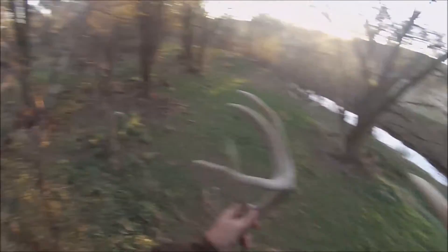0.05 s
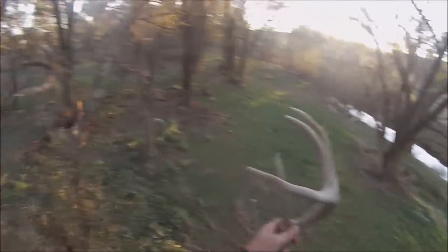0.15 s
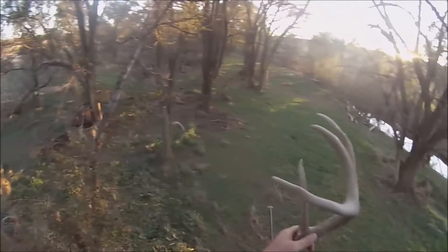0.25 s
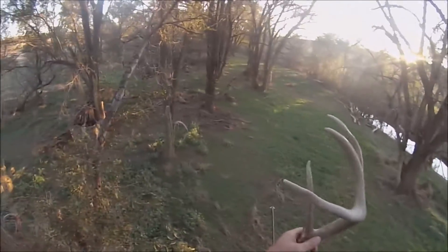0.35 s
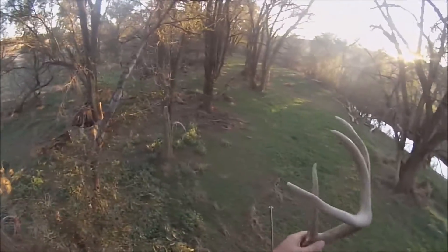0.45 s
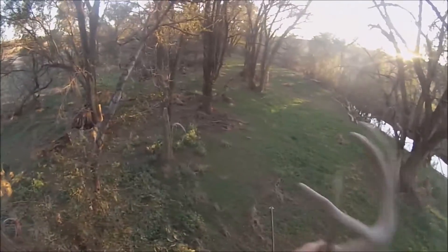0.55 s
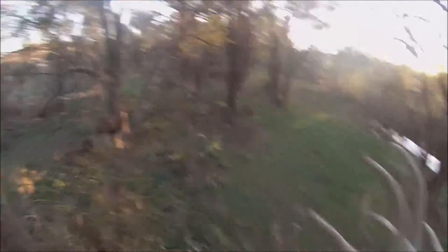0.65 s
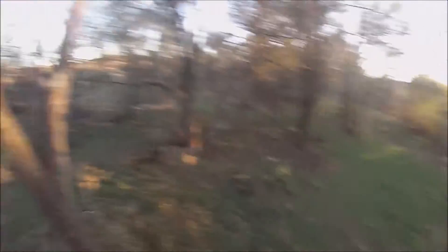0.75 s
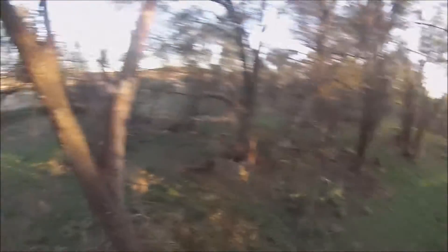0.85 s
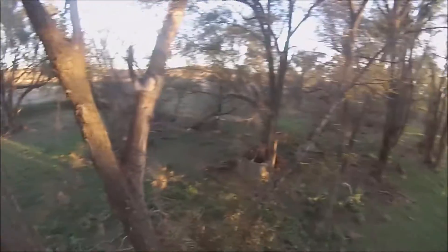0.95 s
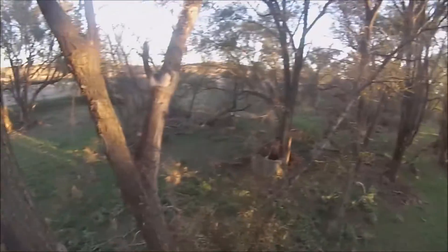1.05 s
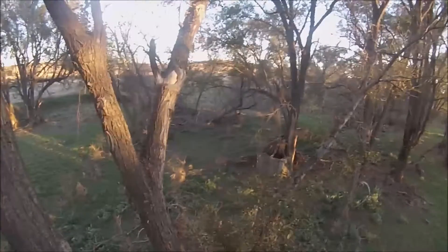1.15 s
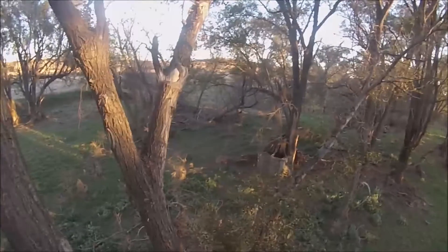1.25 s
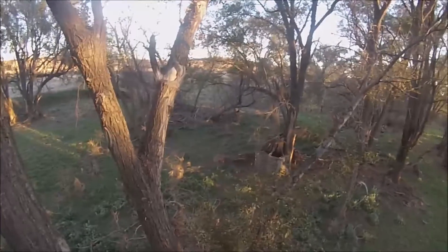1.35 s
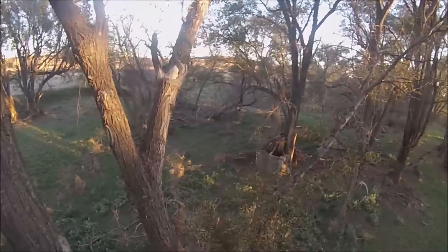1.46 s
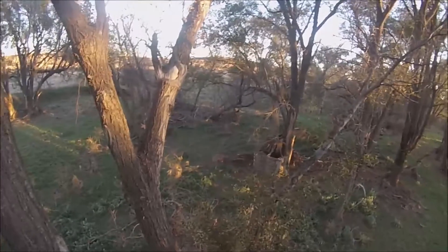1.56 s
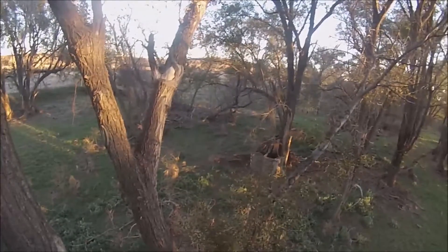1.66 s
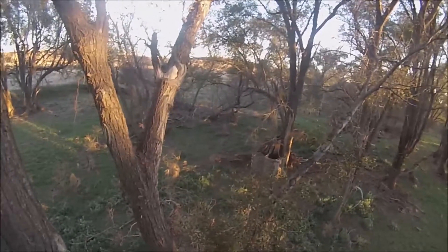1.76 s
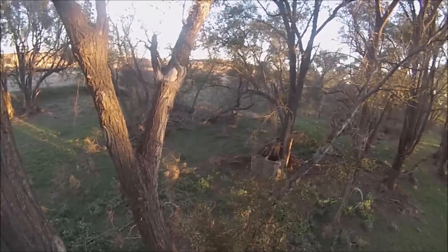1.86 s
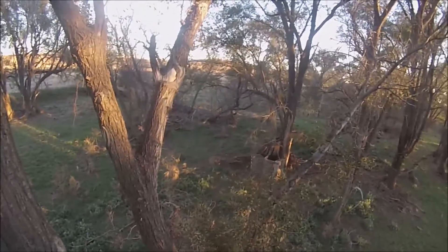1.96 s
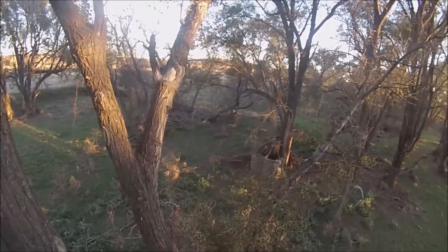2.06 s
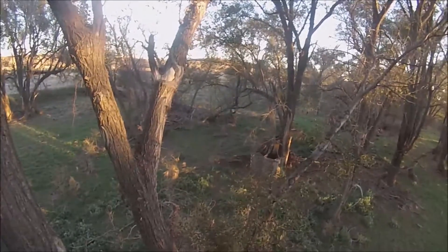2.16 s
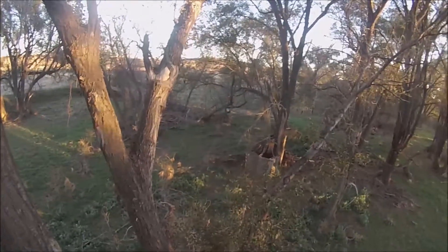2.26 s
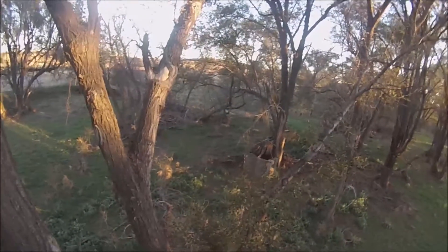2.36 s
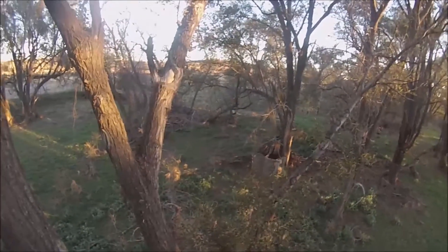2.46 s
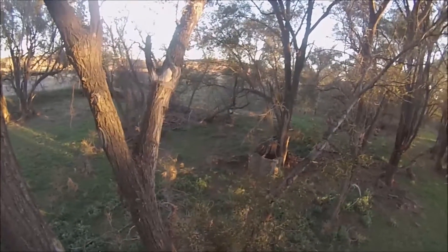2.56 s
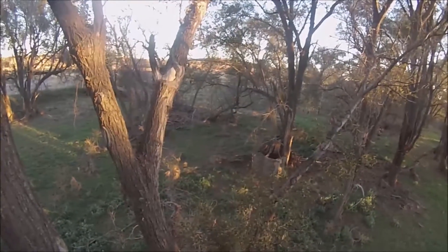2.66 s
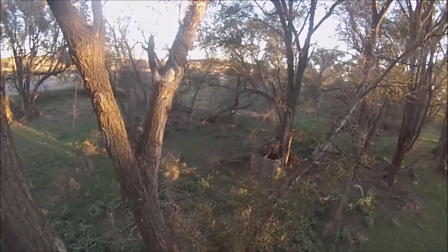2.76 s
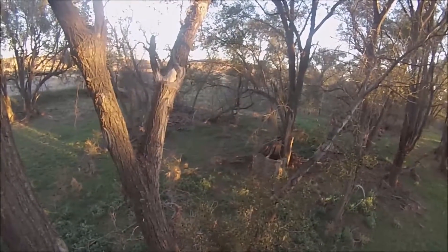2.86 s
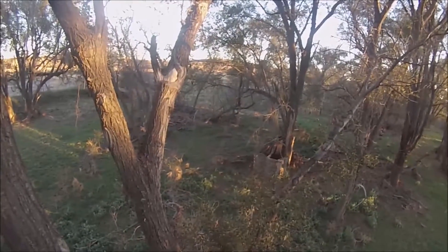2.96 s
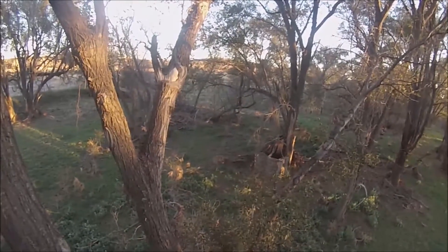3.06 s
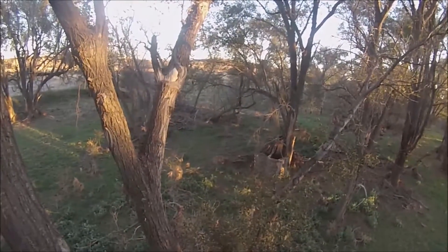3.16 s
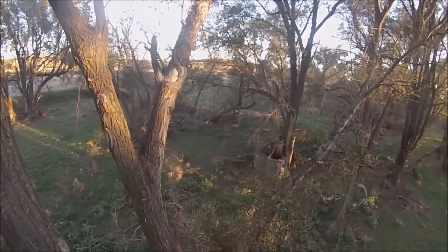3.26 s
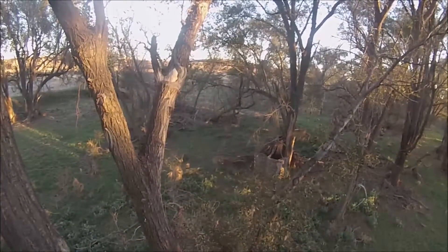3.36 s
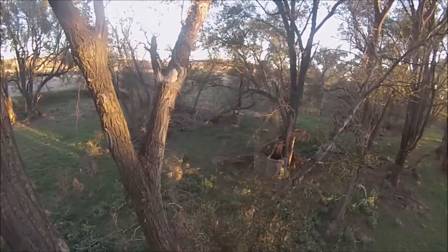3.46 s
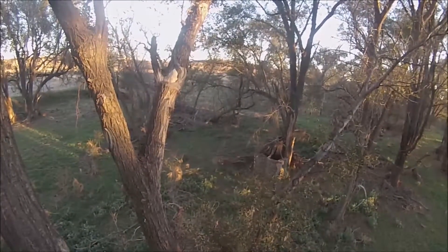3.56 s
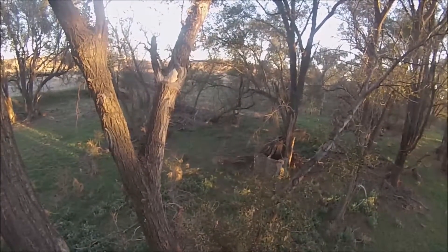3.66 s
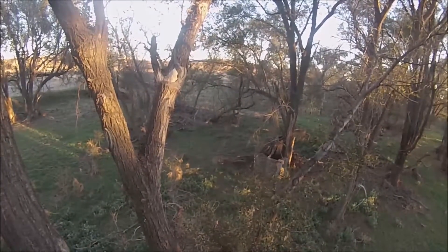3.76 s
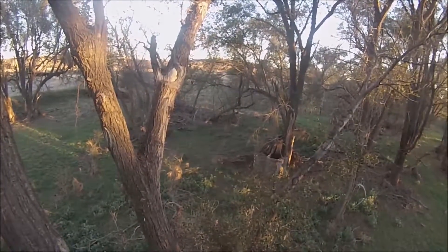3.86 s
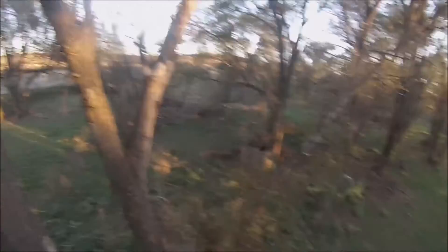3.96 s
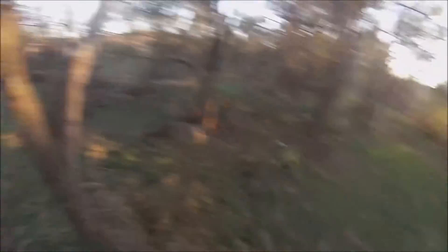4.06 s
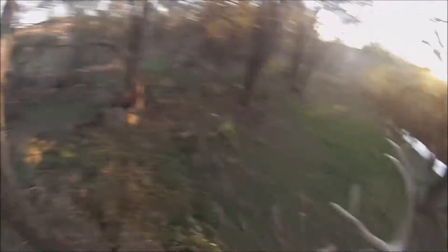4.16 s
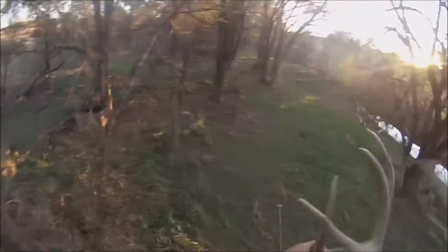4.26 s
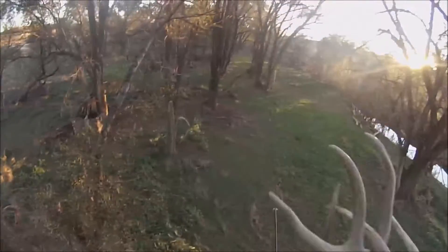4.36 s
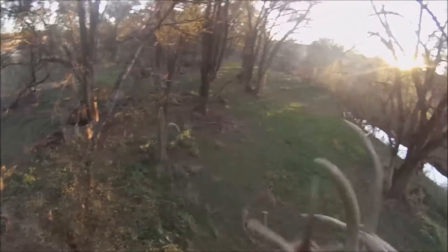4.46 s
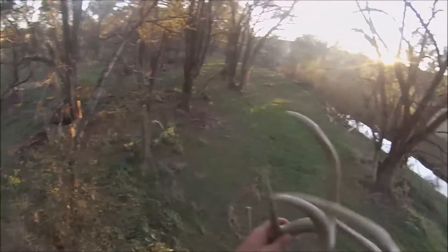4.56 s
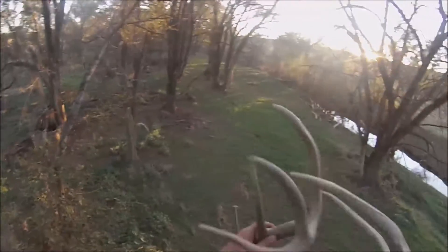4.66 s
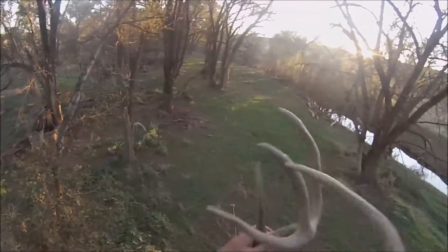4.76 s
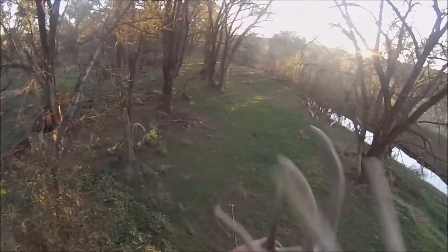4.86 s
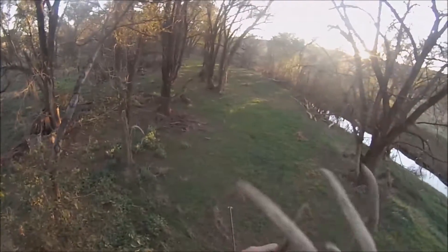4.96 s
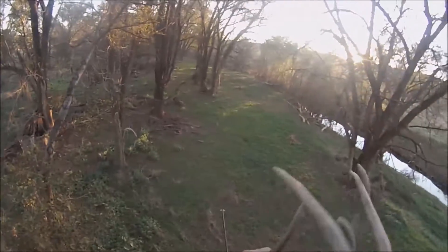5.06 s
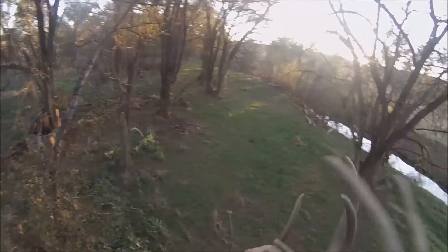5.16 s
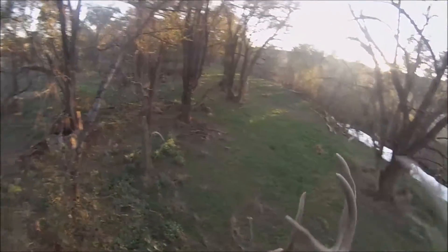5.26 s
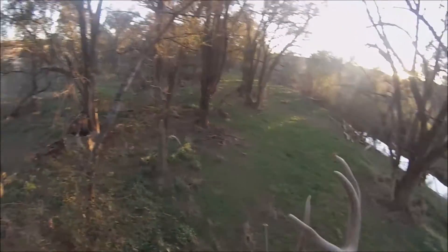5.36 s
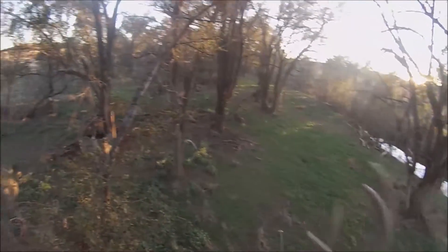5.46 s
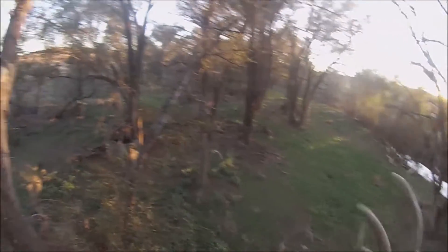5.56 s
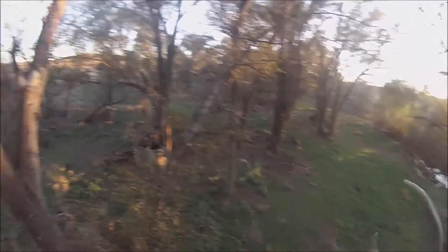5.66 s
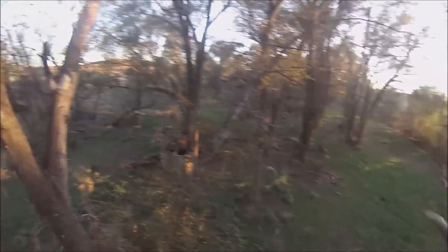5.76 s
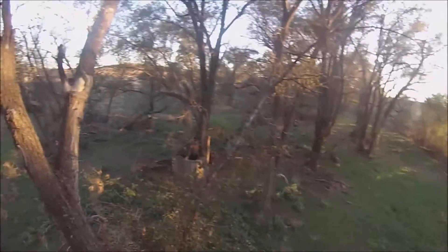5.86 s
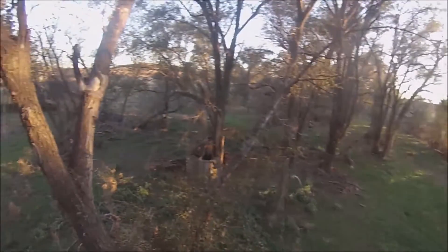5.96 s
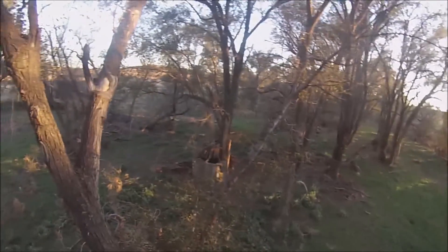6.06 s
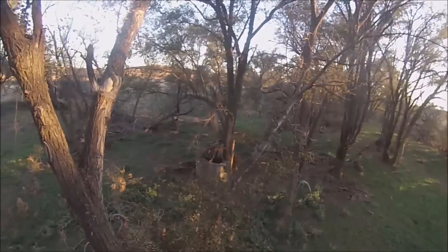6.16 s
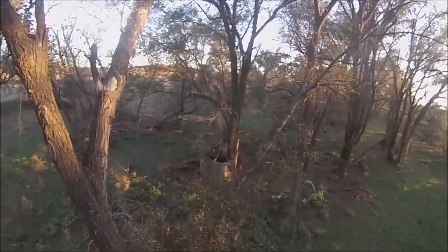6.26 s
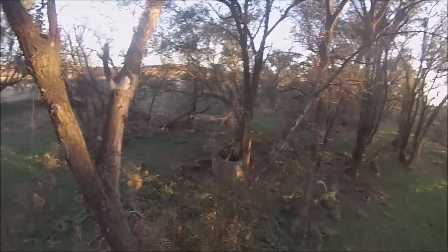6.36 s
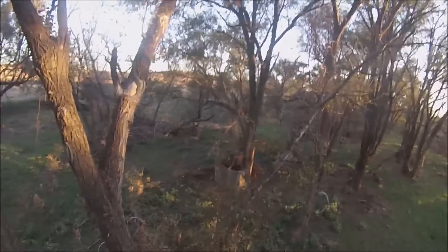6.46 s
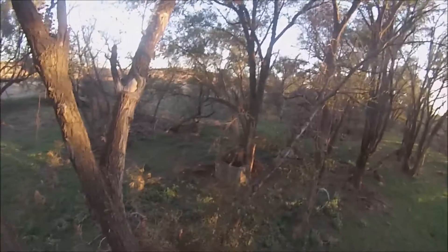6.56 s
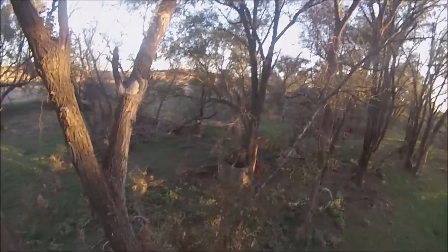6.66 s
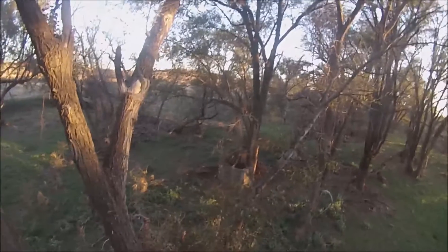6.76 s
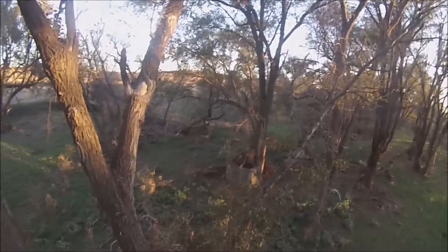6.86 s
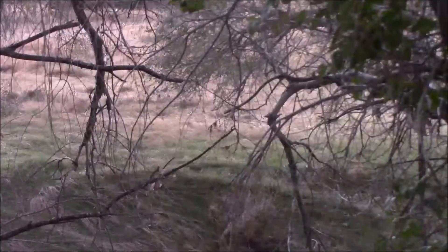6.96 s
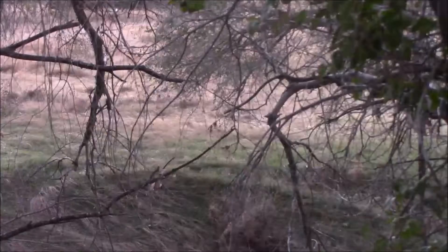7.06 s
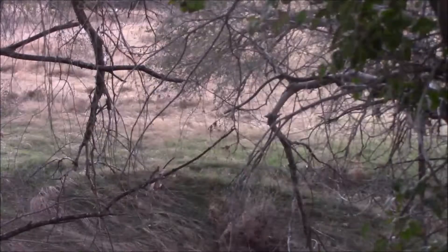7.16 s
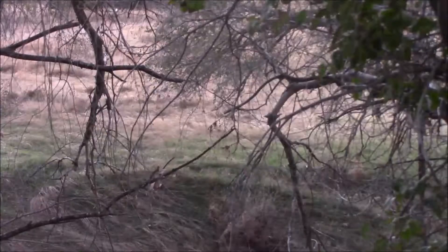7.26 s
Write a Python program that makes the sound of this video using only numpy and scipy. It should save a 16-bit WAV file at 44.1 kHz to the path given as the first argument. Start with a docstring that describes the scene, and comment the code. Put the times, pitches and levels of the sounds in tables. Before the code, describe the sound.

Close, dry rattling of antlers outdoors: hard bony cracks with bright tine ticks and hollow beam knocks around seven hundred hertz. Two short bursts come in the first second, then a quiet gap with faint scrapes. From three seconds on come irregular clusters, dense between four and seven seconds, with grinding between blows. Behind it lie a faint airy hush, low lumpy breeze and a short scattered woodland echo.

```python
"""Up in a tree in quiet woods, a pair of deer antlers is clacked and ground together in quick bouts, at arm's length.
Every contact drives decaying sines: tine tips give bright ticks, thick beams a hollow knock, sliding a grainy rub.
The trunks scatter back a faint tail of decaying noise bands.
Shaped noise makes the hush of the woods and a light, lumpy breeze on the microphone."""
import sys
import numpy as np
from scipy import signal
from scipy.fft import rfft, irfft, next_fast_len
from scipy.io import wavfile

SR = 44100
rng = np.random.default_rng(int(sys.argv[2]) if len(sys.argv) > 2 else 0)


def master_out(mix):
    """Clip the mix to full scale and print it as 16-bit PCM to the path in sys.argv[1]."""
    frames = np.transpose(np.atleast_2d(mix))
    ceiling = np.clip(frames, -1, 1)
    pcm = np.round(ceiling * 32767).astype(np.int16)
    wavfile.write(sys.argv[1], SR, pcm)


N = 321925
TIME_S = np.arange(N) / SR
CUTOFF_HZ = 15900

# one antler struck on the other: (time [s], strength [dB], hollow body [dB], edge near 5 kHz [dB],
#   snap near 10 kHz [dB], beam note [Hz], tine note [Hz], beam note t60 [s],
#   squareness [dB], high = head-on, low = glancing, rebounds [count])
CLACKS = [(0.0941, -19, -9.5, -3, -6, 478, 3300, 0.044, -8, 0),
          (0.1863, -10.5, -8.5, -2, 3, 719, 4180, 0.043, 12, 0),
          (0.22, -26, 4, 3, 5, 669, 2120, 0.07, 15, 0), (0.2447, -12, 0, -5, -2, 800, 2580, 0.038, -8, 0),
          (0.2537, -11, -4.5, 1.5, -2, 1073, 2920, 0.08, 4, 1),
          (0.2685, -12, -3.5, -3.5, -10, 680, 3400, 0.052, -3, 0),
          (0.284, -17, -6.5, -5, -6, 800, 2530, 0.047, -2, 1),
          (0.472, -52, 8, -20, -17, 368, 1780, .04, 7, 0),
          (0.9073, -12.5, -5, -2.5, 7, 557.5, 3020, .03, 2, 0),
          (0.9147, -4, -1.5, -3.5, 5, 727, 2420, .07, -0.5, 0),
          (0.9252, -9.5, 1, -11.5, -13, 729, 1966, 0.11, 9, 0),
          (0.938, -14.5, -0.5, 7, 12.5, 683, 3600, 0.046, 7, 0),
          (0.96, -22, 8.5, -5.5, -7, 680, 2580, 0.042, -16.5, 0),
          (1.2126, -56.5, 21.5, -2, -7, 731, 1690, .06, -12, 0),
          (1.4192, -44, 5, -15, -14, 670, 2620, .05, -13, 0),
          (1.5653, -45.5, 16, -21.5, -10.5, 740, 1820, 0.091, -8.5, 0),
          (2.3645, -48, -2, -7.5, -14.5, 720, 2700, .04, -4.5, 0),
          (2.662, -37.5, 6.5, -7.5, -5, 637, 3256, 0.037, -2, 0),
          (2.732, -27, -1, -9.5, -0.5, 719, 2460, 0.048, -1, 0),
          (2.9862, -13.5, -8, 1, -2.5, 934, 4300, 0.03, 1, 0),
          (3.0081, -8.5, 0, 5, 6, 473, 2480, 0.036, 3, 1),
          (3.018, -9.5, 1.5, 5, 5.5, 710, 2440, 0.052, 0, 0),
          (3.0283, -14.5, 3.5, -11.5, -2, 910, 2080, 0.054, 4, 0),
          (3.0444, -14, 0.5, 5.5, 0, 655, 1763, 0.044, 4, 1),
          (3.0942, -23, 0, 2, -14, 890, 4880, 0.068, -5, 0),
          (3.2165, -41, 2, 9, -1, 660, 2160, 0.036, 0, 0),
          (3.605, -16, 4.5, 11.5, -6, 698, 3730, 0.029, 1.5, 0),
          (3.6999, -17, -4, 2.5, -6, 708, 2284, 0.036, -1, 0),
          (4.1759, -9.5, -13, 1.5, -2, 500, 3460, 0.038, -10.5, 0),
          (4.1821, -13.5, 4, 10, 7.5, 848, 3220, .04, -8, 0),
          (4.1936, -9.5, 1.5, 7.5, 7, 850, 3400, 0.034, 4, 0),
          (4.2106, -10, 6, 0, -8.5, 664, 1920, 0.041, 4, 1),
          (4.225, -13.5, -1, 10, 2, 672, 3330, 0.034, 7, 0),
          (4.2491, -29, 17, 2.5, 0, 683, 1700, 0.037, -5, 0),
          (4.303, -21, 0, 6.5, -9, 673, 5110, 0.048, -17, 0),
          (4.4683, -21.5, 0.5, -4, -10, 727, 2600, 0.017, -8, 0),
          (4.635, -25, 5, -2.5, -21, 741, 2400, 0.034, 0, 0),
          (4.6536, -7.5, -4, -2, -3, 650, 2830, 0.023, -2.5, 0),
          (4.759, -22, 3.5, -14, -11.5, 667, 2340, 0.013, 5, 0),
          (4.8116, -14, 4.5, -6, -14.5, 698, 1950, .075, -2.5, 0),
          (4.832, -22.5, 0, -16, -23, 430, 2170, 0.084, -10, 0),
          (4.9012, -14, 3.5, 1.5, -13.5, 576, 1836, 0.045, 4.5, 0),
          (4.9544, -26.5, -1, 1, 0, 735, 3800, .04, -8, 0),
          (4.9892, -19, -2.5, -6, -5, 740, 2870, 0.02, 2, 0),
          (5.0656, -13, -7, -10, -3.5, 690, 2450, 0.014, -5, 0),
          (5.128, -17.5, 3.5, -3.5, 6.5, 580, 2740, .04, 12, 0),
          (5.1615, -11, -10, -3, -12.5, 1050, 3160, 0.046, 14, 0),
          (5.2583, -15.5, -3, -0.5, 12, 820, 2315, 0.045, 3, 0),
          (5.3099, -14, 1.5, 3.5, 10, 670, 2640, 0.031, -8, 1),
          (5.3499, -19.5, 5, 5, -7, 690, 3440, 0.21, -7, 0),
          (5.4657, -22, -2, -1.5, 4, 715, 2820, 0.05, 9, 0),
          (5.5237, -9.5, -6.5, -1.5, -4, 733.6, 3310, 0.17, 4.5, 0),
          (5.5418, -22.5, 1.5, 9, 3.5, 760, 5310, 0.057, 2.5, 0),
          (5.8523, -6, 0.5, 0, 5, 655, 3188, 0.12, -6.5, 2),
          (5.9708, -36, -10, -5, -12, 685, 2720, 0.038, -7.5, 0),
          (6.2428, -17, -6.5, 0, 7.5, 675, 5070, 0.039, 5.5, 0),
          (6.2678, -13, 2, 3.5, 14, 774, 2690, 0.034, -10, 1),
          (6.2853, -13.5, 5.5, -6, -7, 697, 2395, 0.02, -35, 0),
          (6.403, -25, 10, -8, 10, 693, 2760, 0.023, -7, 0),
          (6.412, -12, -3, 1, -21.5, 1073, 2630, 0.077, 4, 0),
          (6.4638, -22, -2, -9, -15, 750, 2850, .04, -3.5, 0),
          (6.6169, -13, -4.5, -0.5, 2, 686, 2600, 0.063, 3.5, 0),
          (6.7124, -11.5, -0.5, -1, -6, 724, 3260, 0.23, -9.5, 0),
          (6.7438, -18.5, -5, -4, -4, 720, 2260, 0.062, -21, 0),
          (6.8184, -20.5, -26, -5, -8, 696, 2740, .04, -1, 0),
          (6.8463, -31, 3, -2, -3, 726, 2300, 0.037, -15, 0),
          (6.897, -29.5, 4, -7, -10, 1046, 1980, 0.055, -2, 0)]
# tine skipping over the ridges of the other antler: (first tick [s], gap [s], ticks [count], strength [dB],
#   fade per tick [dB], negative = growing, hollow body [dB], edge [dB], snap [dB])
SKIDS = [(0.1204, 0.014, 2, -41.5, -2, 3.5, -4.5, -11.5), (1.006, 0.012, 5, -26.5, 3, 11.5, -3.5, -13),
         (1.274, .0245, 2, -52.5, -2, 10.5, -22, -6), (3.1312, 0.014, 2, -23, 6, 1, -5, -17),
         (3.434, .0158, 5, -33, 1, 1, 4.5, 4), (3.724, 0.016, 3, -27.5, 8, 2.5, 8, -14.5),
         (4.3192, .0064, 2, -25.5, -1, 6, -8.5, -14.5), (4.3988, 0.011, 3, -33.5, 0.5, -3.5, -3, -7),
         (5.0313, 0.0074, 3, -20, 3, 0.5, 2, 6), (5.3685, 0.037, 2, -32.5, 5, 9.5, -11, -14),
         (6.0078, .011, 4, -32, -0.5, 0.5, -3, -4.5), (6.311, 0.032, 3, -27, 4, 7.5, -6, -17.5),
         (6.63, 0.01, 2, -19.5, 6.5, 1.5, 1, 0), (6.662, .0075, 3, -22.5, 5.5, -18, 0, 0.5),
         (6.7264, 0.017, 5, -16.5, 5, 7, -11.5, -10), (6.9105, 0.012, 5, -18, 8.5, -9.5, -3.5, -15.5)]
# antler sliding on antler: (start [s], end [s], slip strength [dB], hollow body [dB], edge [dB], snap [dB],
#   beam note [Hz])
RUBS = [(0.0, 0.04, -53.5, 11, -5.5, -13, 720), (1.009, 1.08, -51.5, 14, -13, -14.5, 558),
        (1.102, 1.388, -66, 16.5, -10.5, -14, 729.5), (1.431, 1.702, -68.5, 15.5, -4.5, -12, 729),
        (2.628, 2.67, -56, 2, -5, 0.5, 682), (3.048, 3.087, -35.5, -11, 4, -8, 687),
        (3.153, 3.245, -53.5, -2, 5, -13.5, 650), (3.526, 3.546, -61.5, 0, 8.5, 11, 680),
        (3.755, 3.795, -50, -7, -3, -14, 720), (4.229, 4.303, -41.5, -2, -1, -10, 685),
        (4.665, 4.71, -57.5, 13, -7.5, -7, 280), (5.135, 5.2, -57.5, 11, -13.5, -13, 320),
        (5.877, 5.94, -48, 7, -4, -7, 709), (6.731, 6.841, -40.5, 5, -11, -8, 716)]
# strong modes of the two antlers: (frequency [Hz], relative energy [dB], t60 [s])
ANTLER_MODES = [(230.4, -21, 0.13), (322, -12, 0.17), (429, -15.5, .25), (493, -9, 0.15),
                (667.5, -9.5, 0.07), (731.9, -7.5, 0.16), (884, -16.5, 0.13), (950, -10, 0.064),
                (1058.5, -13.5, .1), (1211, -11.5, 0.04), (1666, -8.5, 0.086), (1863, -7, 0.025),
                (2010, -8.5, 0.061), (2390, -5.5, 0.063), (2629, -10.5, 0.05), (3197, -10.5, 0.018),
                (3312, -15.5, 0.032), (3750, -15, 0.025), (3827, -22, .035), (4910, -7.5, .025),
                (5497, -15, 0.028), (6334, -12, .026)]
# crowd of weak modes, energy: (frequency [Hz], relative level [dB per Hz])
CRACK_SPECTRUM = [(76, -59), (130, -34.5), (322, -11.5), (491, -9), (565, -17), (664, 2.5), (829, -15),
                  (954, -7), (1270, -16), (1820, -8), (3260, -4), (8400, -21.5), (10700, -27.5),
                  (13100, -38), (16000, -46.5)]
# crowd of weak modes, decay before the length factor: (frequency [Hz], t60 [s])
CRACK_T60 = [(250, 0.03), (700, 0.11), (2000, 0.05), (5000, 0.017), (12000, 0.01)]
# sound scattered by the trees: (frequency [Hz], band level [dB])
WOODS_LEVEL = [(200, -14.5), (700, -20.5), (2000, -30), (5000, -19.5), (12000, -26)]
# decay of the scattered sound: (frequency [Hz], t60 [s])
WOODS_T60 = [(200, 0.39), (700, 0.33), (2000, 0.29), (5000, 0.15), (12000, 0.36)]
# still air, colour: (frequency [Hz], relative level [dB per Hz])
AIR_SPECTRUM = [(15, -32), (25, -13), (145, -9), (170, -16), (263, -14), (317, -15.5), (659, -18),
                (796, -19), (936, -21.5), (3080, -26), (14000, -42), (16000, -49)]
# still air, loudness: (time [s], level [dB])
AIR_LEVEL = [(0, -61.5), (2.0, -61.5), (6.98, -60.5), (7.03, -66), (7.3, -65)]
# breeze on the microphone, before trim and lumps: (time [s], level [dB])
BREEZE_LEVEL = [(0.0, -65), (0.16, -66), (2.4, -72), (2.91, -59), (2.99, -36.5), (3.33, -58), (3.43, -42),
                (3.52, -55.5), (4.43, -54.5), (4.45, -63.5), (5.57, -58), (5.71, -73), (5.85, -59.5),
                (5.94, -65), (6.71, -54), (7.3, -89)]
# breeze on the microphone, colour: (frequency [Hz], relative level [dB per Hz])
RUMBLE_SPECTRUM = [(20, -1.5), (40, 4), (80, -7), (140, -14), (300, -36), (1000, -66)]
# how fast the lumps of breeze come: (rate [Hz], relative level [dB per Hz])
LUMP_RATES = [(1, -6), (10, 0), (30, -20), (200, -90)]

# per rebound: a few ms later, slightly stronger, duller
REBOUND_GAP_S, REBOUND_GAIN_DB, REBOUND_EDGE_LOSS_DB, REBOUND_SNAP_LOSS_DB = 0.0042, 0.5, 4, 8.5
REBOUND_BEAM_T60_S, REBOUND_SQUARE_DB = 0.044, -3.2
SKID_BEAM_HZ, SKID_TINE_HZ, SKID_BEAM_T60_S, SKID_SQUARE_DB = 718, 2433, 0.045, -2.5
SKID_JITTER_GAPS, NOTE_SPREAD_OCTAVES = 0.025, 0.1
# a loosely held beam rings longer and gives off more: dB per doubling of t60
GRIPPED_T60_S, FREE_RING_DB = 0.043, 3.5
TINE_RING_CYCLES = 80  # same number of cycles to t60 at any pitch
SLIP_SPREAD_DB, SLIP_MODE_SPREAD_DB = 3.5, 3
LUMP_DB = 1.5  # rms


def clacks(click_share=0.46, ring_share=0.11):
    """Each knock is a hard click, a dry crack, the struck beam and tine notes, and the ring of the whole rack."""
    knocks = np.array(clack_contacts() + skid_contacts())
    *_, beam_hz, tine_hz, beam_t60_s, square_db = knocks.T
    free_db = FREE_RING_DB * np.log2(beam_t60_s / GRIPPED_T60_S)
    tine_rise_s = 0.00034 * from_db(-2 * square_db)

    click = weak_modes(knocks, level_db=13.5, rise_s=0.00008, length=0.15, count=120)
    crack = weak_modes(knocks, level_db=15.5, rise_s=0.0021, length=0.9)
    beam = struck_notes(knocks, beam_hz, level_db=6.0 + free_db, tilt_db=3.0, t60_s=beam_t60_s,
                        rise_s=0.00041, most_db=23.0)
    tine = struck_notes(knocks, tine_hz, level_db=17.0, tilt_db=-2.5, t60_s=TINE_RING_CYCLES / tine_hz,
                        rise_s=tine_rise_s, most_db=5.5)
    ring = strong_modes(knocks, level_db=14.5, spread_db=7.0, rise_s=0.00031)

    # a head-on blow spends itself in the first click, a glancing one swells into the ring
    click_gain = from_db(click_share * square_db[:, None])
    ring_gain = from_db(-ring_share * square_db[:, None])
    return placed(knocks, click_gain * click + ring_gain * (crack + ring) + beam + tine)


def clack_contacts():
    """Each clack's first contact, then its rebounds on other spots; rows as CLACKS up to squareness."""
    rows = []
    for *first, rebounds in CLACKS:
        rows.append(first)
        time_s, db, body_db, edge_db, snap_db, beam_hz, tine_hz, *_ = first
        for k in range(1, round(rebounds) + 1):
            beam_shift, tine_shift = 2 ** (NOTE_SPREAD_OCTAVES * rng.standard_normal(2))
            rows.append((time_s + k * REBOUND_GAP_S, db + k * REBOUND_GAIN_DB, body_db,
                         edge_db - k * REBOUND_EDGE_LOSS_DB, snap_db - k * REBOUND_SNAP_LOSS_DB,
                         beam_hz * beam_shift, tine_hz * tine_shift,
                         REBOUND_BEAM_T60_S, REBOUND_SQUARE_DB))
    return rows


def skid_contacts():
    """A skid is a run of nearly even, glancing ticks; the tine note wanders with the contact point."""
    rows = []
    for start_s, gap_s, ticks, db, fade_db, *colour_db in SKIDS:
        for k in range(round(ticks)):
            jitter = SKID_JITTER_GAPS * min(k, 1) * rng.standard_normal()  # none on the first tick
            time_s = start_s + gap_s * (k + jitter)
            tine_hz = SKID_TINE_HZ * 2 ** (NOTE_SPREAD_OCTAVES * rng.standard_normal())
            rows.append((time_s, db - k * fade_db, *colour_db, SKID_BEAM_HZ, tine_hz,
                         SKID_BEAM_T60_S, SKID_SQUARE_DB))
    return rows


def grinding():
    """The slips of a rub rasp, ring the antlers and keep one note of the pressed beam humming."""
    rub = slips()
    beam_hz = rub[:, -1]
    rasp = weak_modes(rub, level_db=14.5, rise_s=0.0004, length=0.43)
    ring = strong_modes(rub, level_db=17.5, spread_db=SLIP_MODE_SPREAD_DB, rise_s=0.00045)
    hum = struck_notes(rub, beam_hz, level_db=9, tilt_db=-2.0, t60_s=0.087, rise_s=0.002, most_db=19.5)
    return placed(rub, rasp + ring + hum)


def slips(count=24):
    """A rub is a run of tiny uneven contacts as ridges catch and let go; rows as CLACKS up to beam note."""
    rows = []
    for start_s, end_s, db, *colour_and_note in RUBS:
        moments_s = start_s + (end_s - start_s) * (np.arange(count) + rng.random(count)) / count
        for time_s in moments_s:
            slip_db = db + SLIP_SPREAD_DB * rng.standard_normal()
            rows.append((time_s, slip_db, *colour_and_note))
    return np.array(rows)


def strong_modes(contacts, level_db, spread_db, rise_s):
    """Ring of the whole antlers; the spot that is struck decides each mode's sign and share."""
    hz, energy_db, t60_s = np.transpose(ANTLER_MODES)
    shape = (len(contacts), len(hz))
    signs = rng.choice([-1, 1], shape)
    shares = signs * from_db(energy_db + spread_db * rng.standard_normal(shape))
    shares = shares / np.linalg.norm(shares, axis=1, keepdims=True)
    gains = shares * contact_gains(contacts, hz)
    return from_db(level_db) * gains @ ringing(hz, t60_s, rise_s)


def weak_modes(contacts, level_db, rise_s, length, count=440):
    """Dry crack of many close modes, mixed anew as grip and contact point shift; length scales decay."""
    hz = np.geomspace(130, CUTOFF_HZ, count)
    mean_share = from_db(at_hz(CRACK_SPECTRUM, hz)) * np.sqrt(hz)  # log spacing: bandwidth grows with hz
    mean_share = mean_share / np.linalg.norm(mean_share)
    shares = rng.standard_normal((len(contacts), count)) * mean_share
    gains = shares * contact_gains(contacts, hz)
    return from_db(level_db) * gains @ ringing(hz, length * at_hz(CRACK_T60, hz), rise_s)


def struck_notes(contacts, hz, level_db, tilt_db, t60_s, rise_s, most_db):
    """The part that takes the blow sounds its own note; tilt_db is per octave from 1 kHz."""
    strength = from_db(contacts[:, 1])
    own_gains = np.diag(contact_gains(contacts, hz))
    # one note can take up only so much of a blow
    drive = np.minimum(own_gains, strength * from_db(most_db))
    gains = drive * from_db(level_db + tilt_db * np.log2(hz / 1000))
    return gains[:, None] * ringing(hz, np.full(len(hz), t60_s), rise_s)


def contact_gains(contacts, hz, body_hz=900, middle_hz=1600, upper_hz=2700, edge_hz=4700, snap_hz=9000,
                  favour_db=7.0, favour_octaves=0.06):
    """Drive of each contact at each frequency: tips favour the treble, beams the low modes."""
    corners = np.log([body_hz, middle_hz, upper_hz, edge_hz, snap_hz])
    levels_db = []
    for _, db, body_db, edge_db, snap_db, beam_hz, *_ in contacts:
        colour_db = np.interp(np.log(hz), corners, [body_db, 0, 0, edge_db, snap_db])
        # modes close to the note of the struck beam take up more of the blow
        nearness = np.exp(-(np.log2(hz / beam_hz) / favour_octaves) ** 2)
        levels_db.append(db + colour_db + favour_db * nearness)
    return from_db(levels_db)


def ringing(hz, t60_s, rise_s):
    """One dying sine of unit energy a row; it swells while the blow spreads along the beam."""
    t = TIME_S[:SR // 5]
    decay = np.exp(-np.log(1000) * t / t60_s[:, None])
    rise = 1 - np.exp(-t / np.reshape(rise_s, (-1, 1)))
    rings = np.sin(2 * np.pi * hz[:, None] * t) * decay * rise
    return rings / np.linalg.norm(rings, axis=1, keepdims=True)


def placed(contacts, sounds):
    """Start each sound at its moment of contact."""
    out = np.zeros(N + sounds.shape[1])
    for time_s, sound in zip(contacts[:, 0], sounds):
        start = np.clip(round(time_s * SR), 0, N)
        out[start:start + len(sound)] += sound
    return out[:N]


def above_bass(x, lowest_hz=195):
    """The rattle keeps almost nothing in the deep bass."""
    return signal.sosfilt(signal.butter(4, lowest_hz, "high", fs=SR, output="sos"), x)


def woods(x, build_s, count=12):
    """Trunks and ground return a thin tail: noise bands that build up, then decay each at its own rate."""
    t, echo = TIME_S[:SR * 3 // 4], 0
    edges_hz = np.geomspace(130, CUTOFF_HZ, count + 1)
    for low_hz, high_hz in zip(edges_hz, edges_hz[1:]):
        centre_hz = np.sqrt(low_hz * high_hz)
        band_filter = signal.butter(2, [low_hz, high_hz], "band", fs=SR, output="sos")
        band = signal.sosfilt(band_filter, rng.standard_normal(len(t)))
        build = 1 - np.exp(-(t / build_s) ** 2)
        fade = from_db(-60 * t / at_hz(WOODS_T60, centre_hz)) * build
        echo = echo + from_db(at_hz(WOODS_LEVEL, centre_hz)) * band * fade / np.linalg.norm(fade)
    return signal.fftconvolve(x, echo)[:N]


def background(breeze_db):
    """Faint hush of the woods, and lumps of moving air at the microphone; both shaped noise."""
    hush = from_db(in_time(AIR_LEVEL)) * coloured_noise(AIR_SPECTRUM)
    gusts_db = in_time(BREEZE_LEVEL) + breeze_db + LUMP_DB * coloured_noise(LUMP_RATES)
    return hush + from_db(gusts_db) * coloured_noise(RUMBLE_SPECTRUM)


def coloured_noise(spectrum):
    """Steady noise with the given spectrum, rms one."""
    size = next_fast_len(N)
    hz = np.maximum(np.arange(size // 2 + 1) * SR / size, 1)
    white = rfft(rng.standard_normal(size))
    return unit_rms(irfft(white * from_db(at_hz(spectrum, hz)), size)[:N])


def from_db(db):
    """Decibels to gain."""
    return 10 ** (np.asarray(db) / 20)


def unit_rms(x):
    """Scale to an rms of one."""
    return x / np.sqrt(np.mean(x ** 2) + 1e-20)


def at_hz(points, hz):
    """Read a table along log frequency."""
    known_hz, values = np.transpose(points)
    return np.interp(np.log(hz), np.log(known_hz), values)


def in_time(points):
    """Read a curve at every sample."""
    return np.interp(TIME_S, *np.transpose(points))


def scene():
    """Close antlers, their tail among the trees, and the air."""
    rattle = above_bass(clacks() + grinding())
    return (rattle + woods(rattle, build_s=0.012) + background(breeze_db=-0.5))[None]


def record(dry, ceiling=0.95):
    """The loudest peaks are rounded and the top is cut."""
    rounded = dry / (1 + (dry / ceiling) ** 4) ** 0.25
    return signal.sosfilt(signal.ellip(10, 0.2, 80, CUTOFF_HZ, fs=SR, output="sos"), rounded)


dry = scene()
out = record(dry)
master_out(out)
```